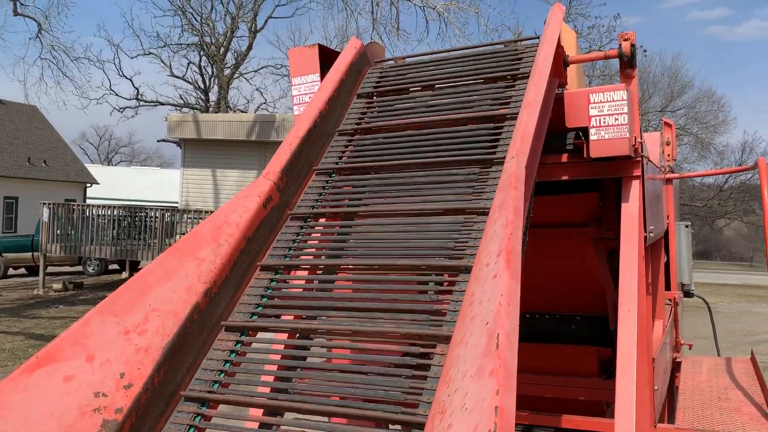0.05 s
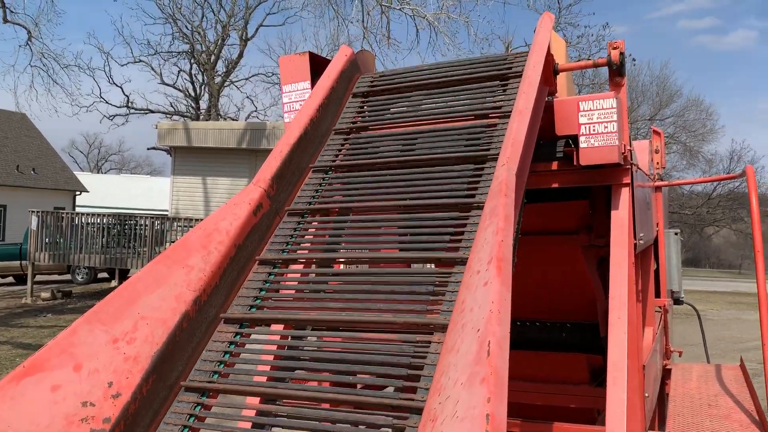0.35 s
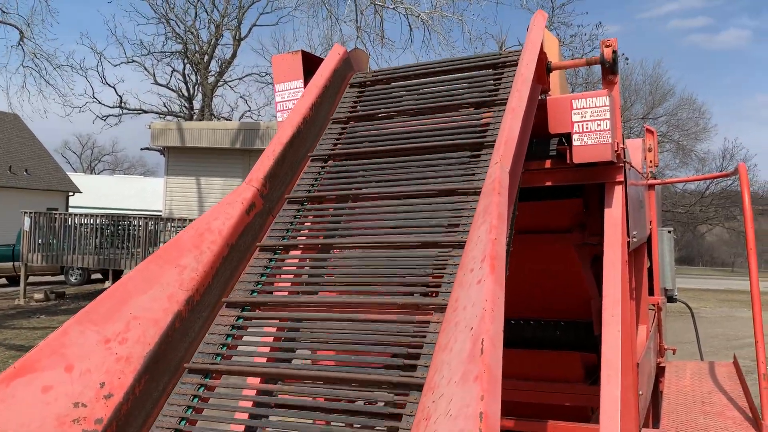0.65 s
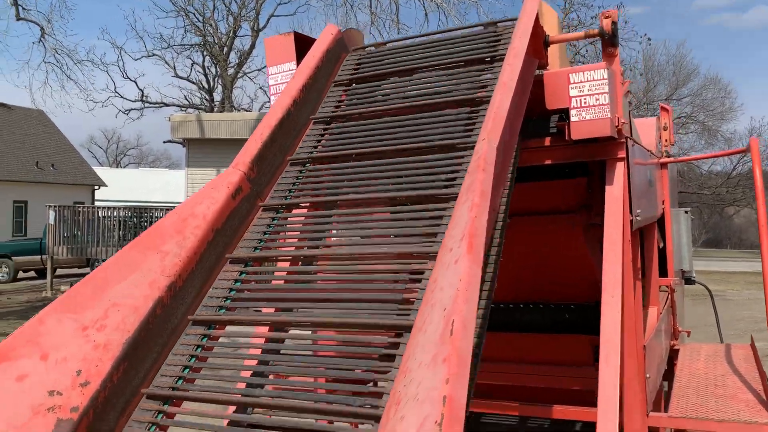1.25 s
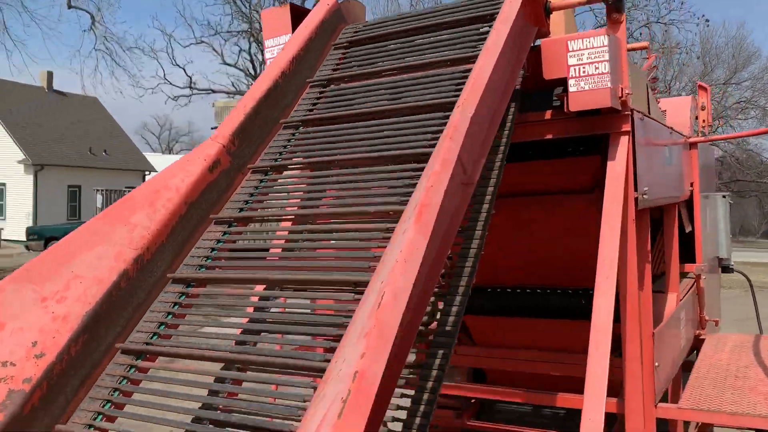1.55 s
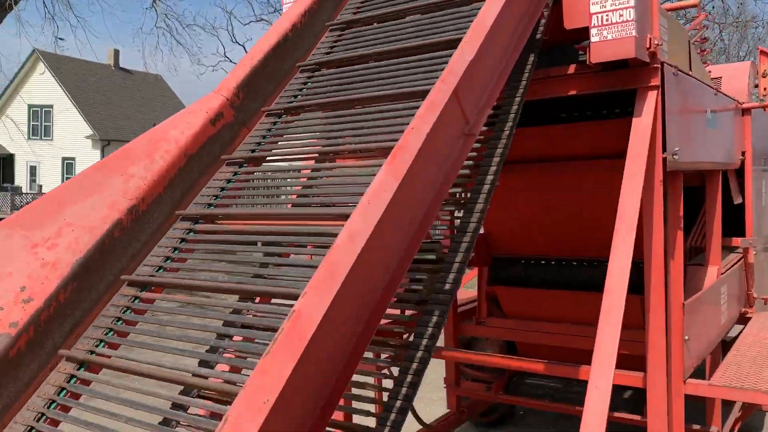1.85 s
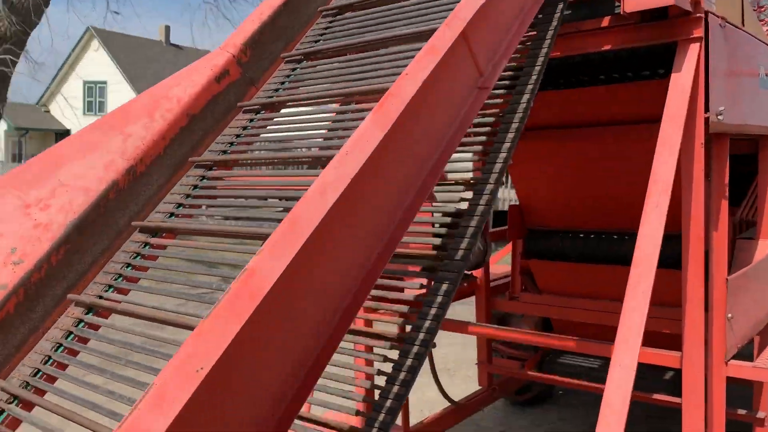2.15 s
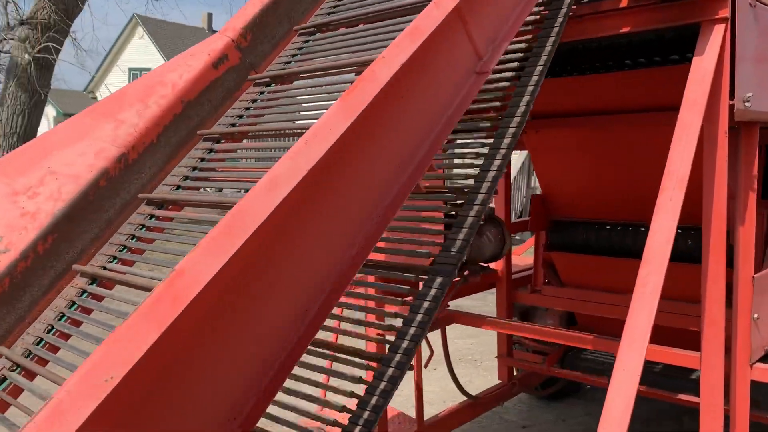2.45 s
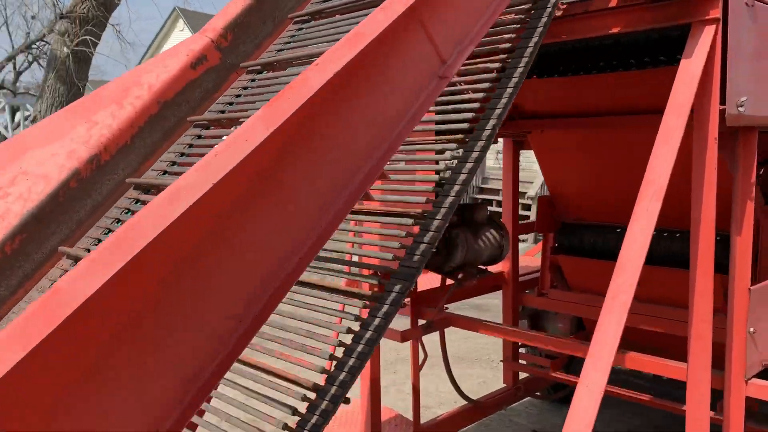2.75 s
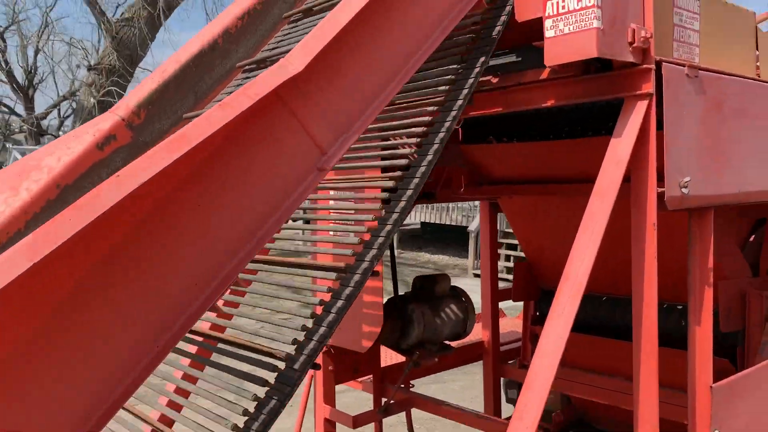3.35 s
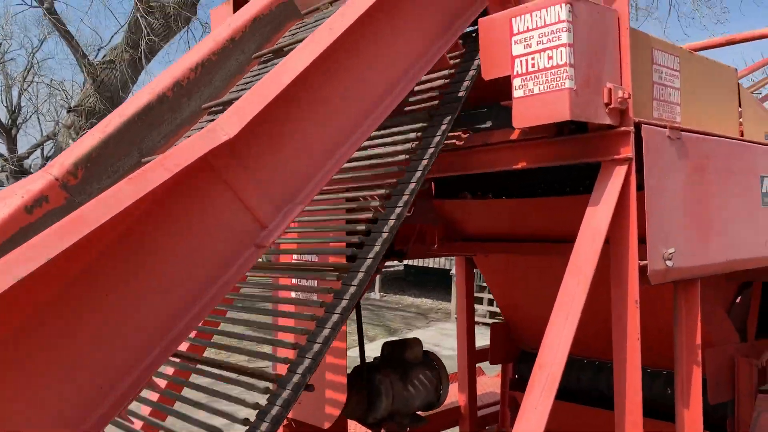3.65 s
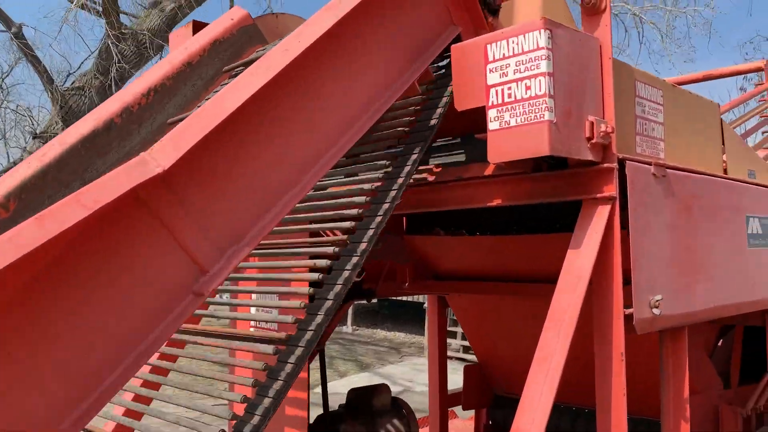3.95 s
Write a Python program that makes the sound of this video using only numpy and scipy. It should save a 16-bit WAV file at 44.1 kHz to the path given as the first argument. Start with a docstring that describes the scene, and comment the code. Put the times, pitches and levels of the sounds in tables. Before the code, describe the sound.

A chain conveyor on a farm machine runs outdoors, its rods rattling and steel panels drumming over a faint motor whine. A few clanks sound early on, then the rattle grows and wind thumps the microphone harder.

```python
"""A rod-chain conveyor on a steel farm machine runs outdoors, heard by someone walking along its side.
From the start, rods rattle over rollers, sheet panels drum, links clatter in short runs and the
motor's gear whine throbs once per shaft turn. The chain clanks on the frame at 0.3 s, twice near 0.9 s
and at 2.1 s; from 0.9 s on, a link snaps now and then. In the second half the rattle grows, gusts
buffet the microphone harder, and the link pins sizzle up toward the end."""
import sys
import numpy as np
from scipy import signal
from scipy.fft import rfft, irfft, dct
from scipy.io import wavfile
from scipy.ndimage import uniform_filter1d

SR = 44100
rng = np.random.default_rng(int(sys.argv[2]) if len(sys.argv) > 2 else 0)


def log_audio(samples):
    """Write samples as a 16-bit WAV file to the path given in sys.argv[1]."""
    # one column per channel
    frames = np.atleast_2d(samples).T
    # limit to full scale, then quantise
    limited = np.clip(frames, -1, 1)
    pcm = np.round(limited * 32767).astype(np.int16)
    wavfile.write(sys.argv[1], SR, pcm)


N = 176400

# rod rattle (time [s], relative level [dB])
RATTLE_ENVELOPE = [(0,-34.5),(1,-37.5),(1.5,-38),(1.95,-36.5),(2.15,-33),(4,-33)]
# rod rattle (frequency [Hz], density [dB])
RATTLE_SPECTRUM = [(400,-17.5),(1000,5.5),(1550,-0.5),(2150,4),(2700,-1),(4400,-10.5),(6200,-10.5),(8000,-37.5)]
# panel drumming (time [s], relative level [dB])
PANEL_ENVELOPE = [(0,-29.5),(.88,-30),(.98,-27),(1.4,-29.5),(3.2,-30),(4,-27.5)]
# panel drumming (frequency [Hz], density [dB])
PANEL_SPECTRUM = [(50,4),(170,-3.5),(290,2),(410,-5),(500,-0.5),(620,-5),(780,-7),(1150,-10.5),(2500,-31.5)]
# links riding over a sprocket (start [s], length [s], relative level [dB])
CLATTER_RUNS = [(0.116,0.026,-39),(0.532,0.015,-36),(0.726,0.032,-36.5),(1,0.051,-36),(1.191,0.09,-39.5),(1.687,0.052,-39.5),(1.993,0.0096,-38.5),(0.908,0.03,-36.5),(2.438,0.053,-35.5),(2.546,0.061,-33.5),(2.75,0.081,-38.5),(3.003,0.056,-37),(3.134,0.039,-38.5),(3.485,0.038,-37),(3.652,0.18,-37.5),(3.891,0.12,-37)]
# jingle between runs, louder near the return side (time [s], relative level [dB])
JINGLE_ENVELOPE = [(0,-42),(1.4,-43.5),(1.9,-46),(2.4,-39),(4,-44.5)]
# link clicks (frequency [Hz], density [dB])
LINK_SPECTRUM = [(900,-4.5),(2200,3),(3500,0.5),(4400,0),(5300,-6),(8400,-0.5),(9300,-11),(11300,-5),(13200,-26)]
# treble loss of the scattered jingle (frequency [Hz], gain [dB])
SCATTER_RESPONSE = [(5800,0),(7800,-7)]
# steel rod modes (frequency [Hz], relative level [dB])
ROD_RESONANCES = [(2990,-9),(3975,0),(4130,-5),(4480,-5),(4956,-13),(7714,-11),(8370,-8)]
# steel frame modes (frequency [Hz])
FRAME_MODES_HZ = [1035,1117,1165,1335,1463,1588,1690,1847,1950,2070,2135]
# chain blows on the frame (time [s], level [dB], main resonance [Hz])
CLANK_EVENTS = [(0.281,-30,1360),(0.925,-25.5,870),(0.944,-22,530),(2.116,-24,1110)]
# link snaps (time [s], level [dB])
SNAP_EVENTS = [(.923,-34.5),(1.542,-38),(1.674,-36),(2.109,-32),(3.343,-35),(3.907,-35)]
# link snaps (frequency [Hz], density [dB])
SNAP_SPECTRUM = [(1500,-10),(4000,4),(8300,1),(15500,-14)]
# pin sizzle (time [s], level [dB])
PIN_ENVELOPE = [(1.4,-66),(1.65,-50),(1.9,-70),(2.8,-55.5),(4,-49)]
# pin sizzle (frequency [Hz], density [dB])
PIN_SPECTRUM = [(8000,-30),(11000,-8),(11213,5),(11450,-9),(15300,-13)]
# gear mesh tone and sidebands (offset [shaft orders], level [dB])
GEAR_TONES = [(-1,-44.5),(0,-42),(1,-50.5)]
# other drive tones (frequency [Hz], level [dB])
HUM_TONES = [(353,-50),(712,-46)]
# gusts on the microphone (start [s], length [s], relative level [dB])
GUST_EVENTS = [(0,0.15,-30),(0.694,0.11,-25.5),(0.866,0.035,-23.5),(1.34,0.062,-29.5),(1.535,0.37,-26),(1.64,0.019,-27),(1.93,0.018,-16.5),(2.294,0.019,-11.5),(2.232,0.42,-24.5),(2.472,.16,-18.5),(2.68,0.029,-19),(2.816,0.029,-19.5),(2.912,0.066,-15.5),(2.998,0.085,-21),(3.212,0.42,-21),(3.343,.006,-16),(3.121,0.038,-17),(3.979,0.027,-20.5)]
# gust turbulence (frequency [Hz], density [dB])
GUST_SPECTRUM = [(15,-14),(55,6),(110,-3.5),(230,-9),(350,-15.5),(600,-31),(2000,-49)]
# breeze turbulence (frequency [Hz], density [dB])
BREEZE_SPECTRUM = [(15,-13),(45,2),(70,1),(130,-12.5),(400,-39.5)]
# right microphone port against left (frequency [Hz], gain [dB])
PORT_TILT = [(3000,0),(5400,4.5),(7800,0)]

PANEL_LAG_MS, ROD_LAG_MS, LINK_LAG_MS = 0.05, 0.06, 0.255  # at the left port
LINKS_PER_S, LINK_SPREAD_DB, LINK_T60_S = 800, 5.5, 0.062
ROD_SPREAD_DB, FRAME_T60_S, SHAFT_HZ = 3, 0.18, 30
TIME_S = np.arange(N) / SR


def undb(db):
    """Decibels to gain."""
    return 10 ** (np.asarray(db) / 20)


def unit(x):
    """Scale to rms 1."""
    return x / np.sqrt(np.mean(x ** 2) + 1e-20)


def curve(points):
    """Gain along (time [s], level [dB]) points."""
    return undb(np.interp(TIME_S, *np.array(points).T))


def fade(t60_s):
    """Exponential decay."""
    return np.exp(-np.log(1000) * TIME_S / t60_s)


def swell_power(events, rise_s, fall_s):
    """Summed power of events that rise linearly, hold and decay."""
    power = 0
    for start_s, length_s, db in events:
        t = TIME_S - start_s
        swell = np.clip(t / rise_s, 0, 1) * np.exp(-np.clip((t - length_s) / fall_s, 0, 20))
        power += (undb(db) * swell) ** 2
    return power


def drift(rate_hz):
    """Smooth random drift, spread near 1."""
    hold = int(SR / rate_hz)
    steps = np.repeat(rng.standard_normal(600), hold)[:N]
    return 1.864 * uniform_filter1d(uniform_filter1d(steps, hold), hold)


def per_bin(hz, values):
    """Interpolate onto FFT bins in log frequency."""
    return np.interp(np.log(np.arange(N // 2 + 1) * SR / N + 1e-3), np.log(hz), values)


def colour(x, points):
    """Minimum-phase filter; falls 24 dB per octave above the last point."""
    hz, db = np.array(points, float).T
    octaves = np.arange(1, 5)
    response_db = per_bin(np.append(hz, hz[-1] * 2 ** octaves), np.append(db, db[-1] - 24 * octaves))
    cepstrum = irfft(np.log(undb(response_db)), N)
    cepstrum[1:N // 2] *= 2
    cepstrum[N // 2 + 1:] = 0
    return irfft(rfft(x) * np.exp(rfft(cepstrum)), N)


def ring(x, response):
    """Convolve with an impulse response."""
    return signal.fftconvolve(x, response[:SR // 2])[:N]


def modal(hz, db, t60_s):
    """Impulse response of damped modes at random phases."""
    t = TIME_S[:SR // 2]
    modes = sum(undb(d) * np.sin(2 * np.pi * (f * t + rng.random())) for f, d in zip(hz, db))
    return modes * fade(t60_s)[:len(t)]


def impacts(per_s, spread_db):
    """Random blows of uneven strength."""
    hits = (rng.random(N) < per_s / SR) * np.sign(rng.standard_normal(N))
    return hits * undb(spread_db * np.clip(rng.standard_normal(N), -2, 2))


def steel(blows, t60_s, spectrum, crack, parts=5):
    """Each blow cracks, then rings one part's dense modes. Returns (direct, scattered)."""
    part, size = rng.integers(parts, size=N), SR // 2
    paths = []
    for path_crack in (crack, 0):
        responses = rng.standard_normal((parts, size)) * fade(t60_s)[:size]
        ringing = sum(ring(blows * (part == k), r / np.linalg.norm(r)) for k, r in enumerate(responses))
        paths.append(unit(colour(path_crack * blows + ringing, spectrum)))
    return np.array(paths)


def burst(start_s, t60_s, spectrum):
    """One blow: a crack and a dense tail. Returns (direct, scattered)."""
    noise = rng.standard_normal((2, N))
    crack = 0.8 * fade(t60_s=0.012)
    envelope = np.pad(fade(t60_s) + crack, (int(start_s * SR), 0))[:N]
    return colour(noise * envelope, spectrum) / np.std(colour(noise, spectrum))


def place(paths, lag_ms, scatter, scatter_lag_s=0.017):
    """Direct sound reaches the left port late, scattered sound the right."""
    direct, diffuse = paths
    left = np.pad(direct, (round(lag_ms * SR / 1000), 0))[:N] + scatter * diffuse
    right = direct + scatter * np.roll(diffuse, round(scatter_lag_s * SR))
    return np.array([left, right]) / np.hypot(1, scatter)


def rod_rattle(gain_db=-1):
    """Rods rattle on rollers, shaken once per shaft turn."""
    shake = 1 + 0.36 * np.sin(2 * np.pi * SHAFT_HZ * TIME_S)
    blows = impacts(per_s=330, spread_db=ROD_SPREAD_DB) * shake
    rattle = steel(blows, t60_s=0.2, spectrum=RATTLE_SPECTRUM, crack=0.24)
    return place(rattle, ROD_LAG_MS, scatter=0.81) * curve(RATTLE_ENVELOPE) * undb(gain_db)


def panel_drumming(gain_db=3):
    """The moving chain knocks on the sheet-steel sides."""
    knocks = impacts(per_s=260, spread_db=1.5)
    drumming = steel(knocks, t60_s=0.19, spectrum=PANEL_SPECTRUM, crack=0.7, parts=3)
    return place(drumming, PANEL_LAG_MS, scatter=0.5) * curve(PANEL_ENVELOPE) * undb(gain_db)


def rod_clinks(spots=8, mix_db=8, db_per_octave=-3.5, gain_db=-3):
    """Loose rods knock on the frame; each spot stirs its own mix of modes."""
    knocks = impacts(per_s=55, spread_db=ROD_SPREAD_DB)
    spot = rng.integers(spots, size=N)
    hz, paths = np.array(FRAME_MODES_HZ), np.zeros((2, N))
    for k in range(spots):
        detune, strength = rng.uniform(-0.97, 1, (2, len(hz)))
        db = mix_db * strength + db_per_octave * np.log2(hz / hz[0])
        for path in paths:
            path += ring(knocks * (spot == k), modal(hz * (1 + 0.008 * detune), db, FRAME_T60_S))
    return place(unit(paths), ROD_LAG_MS, scatter=0.68) * curve(RATTLE_ENVELOPE) * undb(gain_db)


def link_clatter(rods=4, ring_db=-6.5, gain_db=1.98):
    """Link clicks swell in runs over a sprocket and ring slightly unlike rods."""
    power = curve(JINGLE_ENVELOPE) ** 2 + swell_power(CLATTER_RUNS, rise_s=0.0052, fall_s=0.026)
    clicks = impacts(LINKS_PER_S, LINK_SPREAD_DB) * np.sqrt(power)
    paths = steel(clicks, LINK_T60_S, LINK_SPECTRUM, crack=0.28)
    rod = rng.integers(rods, size=N)
    hz, db = np.array(ROD_RESONANCES).T
    blows = clicks * power ** 0.14  # rods ring most when the chain runs hard
    tunings = 1 + 0.003 * np.linspace(-1, 1, rods)
    for path in paths:
        responses = [modal(hz * tuning, db, t60_s=0.15) for tuning in tunings]
        ringing = sum(ring(blows * (rod == k), r) for k, r in enumerate(responses))
        path += undb(ring_db) * unit(ringing)
    paths[1] = colour(paths[1], SCATTER_RESPONSE)
    return place(paths, LINK_LAG_MS, scatter=1.33) * np.sqrt(np.mean(power)) * undb(gain_db)


def frame_clanks(skirt_db_per_octave=-9, ring_db=-18):
    """Heavy chain blows crash, then ring the frame around the struck part's resonance."""
    paths, modes_hz = 0, np.array(FRAME_MODES_HZ)
    for start_s, db, hz in CLANK_EVENTS:
        modes_db = ring_db + skirt_db_per_octave * np.abs(np.log2(modes_hz / hz))
        ringing = np.pad(modal(modes_hz, modes_db, FRAME_T60_S), (int(start_s * SR), N))[:N]
        body = [(hz / 4, 2 * skirt_db_per_octave), (hz, 0), (hz * 2, skirt_db_per_octave)]
        paths += undb(db) * (burst(start_s, t60_s=0.18, spectrum=body) + ringing)
    return place(paths, ROD_LAG_MS, scatter=0.51)


def link_snaps():
    """Single links drop sharply into the sprocket."""
    snaps = sum(undb(db) * burst(at_s, t60_s=0.15, spectrum=SNAP_SPECTRUM) for at_s, db in SNAP_EVENTS)
    return place(snaps, LINK_LAG_MS, scatter=0.35)


def pin_sizzle():
    """Dry link pins tick finely and ring very high."""
    ticks = steel(impacts(LINKS_PER_S, LINK_SPREAD_DB), LINK_T60_S, PIN_SPECTRUM, crack=0.25)
    return place(ticks, LINK_LAG_MS, scatter=0.33) * curve(PIN_ENVELOPE)


def motor(mesh_hz=516.8):
    """Gear whine and hum; speed wavers with the load."""
    speed = 1 + 0.002296 * drift(rate_hz=9.8)
    rad_per_hz = 2 * np.pi * np.cumsum(speed) / SR
    tones = [(mesh_hz + order * SHAFT_HZ, db) for order, db in GEAR_TONES] + HUM_TONES
    return sum(undb(db) * unit(np.sin(hz * rad_per_hz + 2 * np.pi * rng.random())) for hz, db in tones)


def wind(gust_gain_db=2.5, breeze_db=-31.5, width=0.23):
    """A breeze rumbles on the microphone; gusts thump and reach higher in pitch."""
    gusts = np.sqrt(swell_power(GUST_EVENTS, rise_s=0.0024, fall_s=0.0051))
    eddies = unit(colour(rng.standard_normal((2, N)), GUST_SPECTRUM))
    eddies /= np.sqrt(uniform_filter1d(eddies ** 2, size=SR // 40, axis=1))  # level over 25 ms
    breeze = unit(colour(rng.standard_normal((2, N)), BREEZE_SPECTRUM))
    mid, side = undb(gust_gain_db) * gusts * eddies + undb(breeze_db) * breeze
    return np.array([mid + width * side, mid - width * side])


def scene():
    """The running machine in the wind."""
    chain = panel_drumming() + rod_rattle() + rod_clinks() + link_clatter() + pin_sizzle()
    return chain + link_snaps() + frame_clanks() + motor() + wind()


def record(dry):
    """The two ports differ in tone; the recorder cuts above 15.7 kHz."""
    tilt_db = np.repeat(per_bin(*np.array(PORT_TILT, float).T), 2)[:N] / 2  # half per port
    spectrum = dct(dry, norm="ortho") * undb([-tilt_db, tilt_db])
    heard = dct(spectrum, type=3, norm="ortho")
    return signal.sosfilt(signal.ellip(8, 0.2, 70, 15700, fs=SR, output="sos"), heard)


dry = scene()
out = record(dry)
log_audio(out)
```